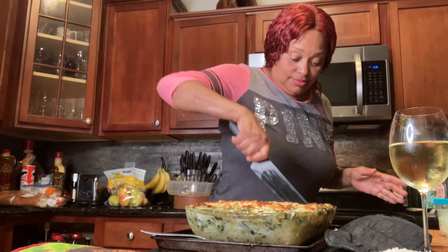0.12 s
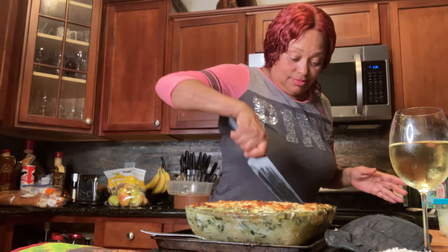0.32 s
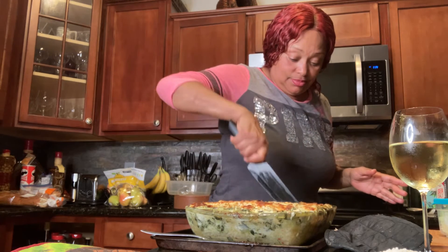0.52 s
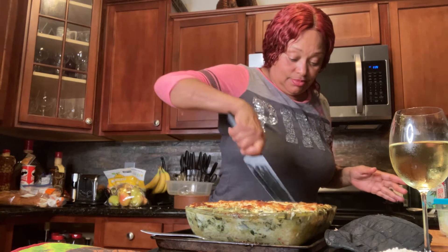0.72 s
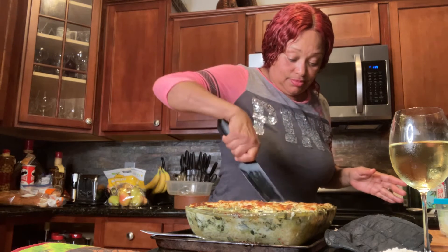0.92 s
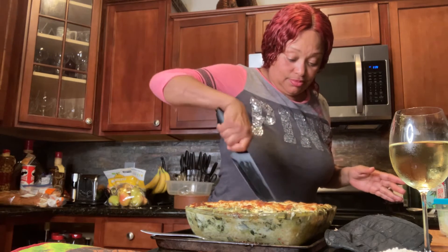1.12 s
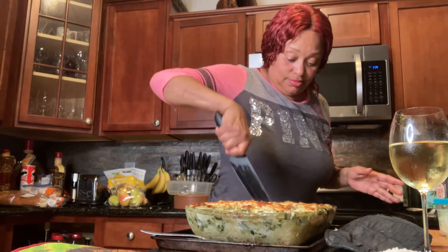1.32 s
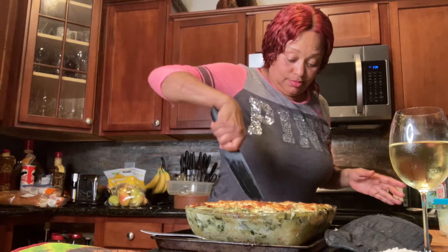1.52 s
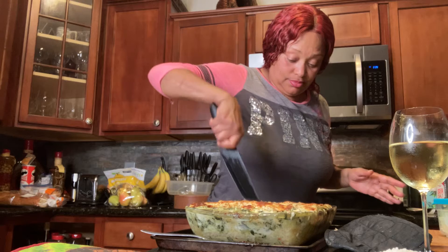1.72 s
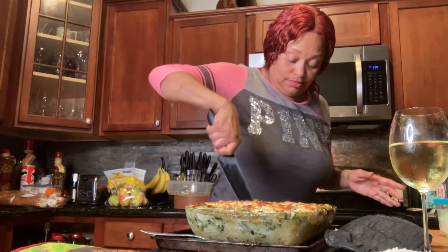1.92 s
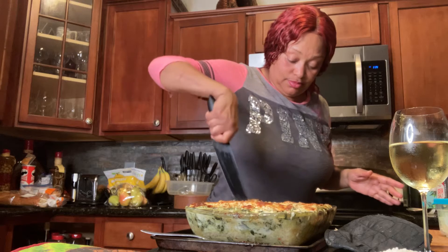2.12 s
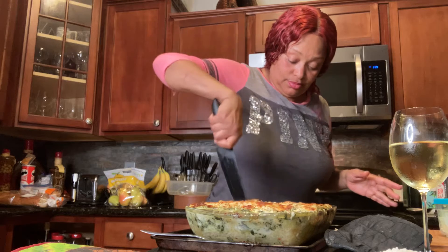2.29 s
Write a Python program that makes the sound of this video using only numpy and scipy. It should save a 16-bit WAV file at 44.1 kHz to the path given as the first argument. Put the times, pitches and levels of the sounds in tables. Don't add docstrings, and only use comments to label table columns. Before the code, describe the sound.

Six separate knife knocks on a food-loaded glass dish, unhurried and fairly even, moving from deep counter thumps to crisp clacks; slight crust crunch, short lively kitchen echo, quiet room hum, slightly dulled phone microphone nearby.

```python
import sys
import numpy as np
from scipy import signal
from scipy.io import wavfile

SR = 44100
rng = np.random.default_rng(int(sys.argv[2]) if len(sys.argv) > 2 else 0)


def digitize_waveform(pressure):
    field = np.atleast_2d(pressure).T
    bounded = np.clip(field, -1, 1)
    quanta = np.round(bounded * 32767).astype(np.int16)
    wavfile.write(sys.argv[1], SR, quanta)


def gain_from_db(level_db):
    decades = np.asarray(level_db, float) / 20
    return 10 ** decades


N = 101430

# start_s, counter_db, edge_db, crack_db
CHOPS = [
    (0.2046, 1.5, -8.5, -5.5),
    (0.6140, 0, -3, -3),
    (0.9436, -9, -3.5, -3),
    (1.3157, -13, -7, -6),
    (1.6688, -11, -3, -1.5),
    (1.9801, -8.5, -1, 0),
]
CHOP_PLACE = [0.28, 0.37, 0.68, 0.2, 0.84, 0.95]
# pitch_hz, t60_s (time to fade by 60 dB)
GLASS_NOTES = [(805, 0.013), (1100, 0.012), (1280, 0.012), (1450, 0.018), (1620, 0.013), (1920, 0.0083)]
# note1_db, note2_db, note3_db, note4_db, note5_db
GLASS_STRIKES = [(-20, -31, -25.5, -46, -31), (-31.5, -26, -34, -40, -33), (-31.5, -32, -28.5, -36, -34),
                 (-35.5, -33, -31.5, -40.5, -36), (-29.5, -34, -25.5, -46, -32),
                 (-28, -33.5, -25, -46, -29.5)]
# pitch_hz, level_db, t60_s
EDGE_NOTES = [(2360, 10, 0.003), (2730, -1, 0.014), (3510, 6.5, 0.003), (4050, -9.5, 0.013),
              (4533, -3, .012), (5160, -6, 0.0072), (5485, 1.5, 0.0044), (6200, -11, .006)]
# pitch_hz, gain (signed), t60_s
COUNTER_NOTES = [(328.2, 0.044, 0.083), (384.6, 0.62, 0.086), (403, -0.028, 0.02), (470.3, -0.62, 0.093),
                 (523.2, 0.14, 0.3), (593, 0.17, 0.043), (193, 0.021, 0.097)]
# start_s, length_s, level_db
SLIPS = [
    (0.0, 0.084, -94),
    (.3, 0.2, -79.5),
    (1.224, 0.12, -75),
]
ECHO_DELAYS = [.0030, .0060, .0095, .0128, .0150, .0190, .024]
ECHO_TREBLE = [.5, .5, .45, 1.7, 1.0, .55, .5]
ECHO_BASS = [.1, .2, .15, .4, .15, .25, .2]
# pitch_hz, t60_s, level_db
KITCHEN_TAIL = [(202, .35, -27), (450, 0.61, -5.5), (653, 0.48, -0.5), (907, 0.97, 1.5), (1600, 0.98, 1.5),
                (2550, 0.98, 12), (5570, 0.86, 12), (12000, 0.61, 17)]
# pitch_hz, level_db, t60_s
STANDING_WAVES = [(333.4, -25, 0.31), (370.8, -54, 0.12), (461.4, -29, 0.12), (494, -36.5, 0.53)]
# pitch_hz, level_db (per Hz)
MURMUR = [(40, -36.5), (95, -6), (300, 3.5), (720, -12), (2500, -24), (6500, -36), (9000, -54),
          (14500, -37.5)]

CRACK_DB, EDGE_DB, COUNTER_DB = -24, -38, -10.5
TOP_NOTE_DB = -10
EDGE_LUCK_DB = 2
GRIT_S, GRIT_DB = 0.011, -21 - 32.5
PUSH_LEAD_S, PUSH_DB = 0.008, -23.5
BOOM_LEAD_S, BOOM_LAG_S = 0.001142, 0.00187
BOOM_LOW_HZ = 168
SLIP_HZ, SLIP_WIDTH_HZ = 6460, 990
SPLIT_HZ = 2200
TAIL_DB, BASS_RISE_S, TREBLE_RISE_S = -39, 0.025, 0.0074
EARLY_DB, EARLY_T60_S = 6, 0.27
STANDING_DB = -27.5
MURMUR_DB = -56.5
HUM_HZ, HUM_WIDTH_HZ, HUM_DB = 98, 13.6, -66
MIC_LOW_HZ, MIC_CUT_HZ = 90, 6350
MIC_TOP_HZ, MIC_TOP_DB = 8550, -17.5


def rms_one(x):
    return x / np.sqrt(np.mean(x ** 2) + 1e-20)


def at_hz(points, hz, column=1):
    p = np.array(points)
    return np.interp(np.log(hz), np.log(p[:, 0]), p[:, column])


def butter(x, hz, kind, order=2):
    return signal.sosfilt(signal.butter(order, hz, kind, fs=SR, output="sos"), x)


def ring(hits, hz, t60):
    shrink = gain_from_db(-60 / (t60 * SR))
    turn = 2 * np.pi * hz / SR
    return signal.lfilter([0, np.sin(turn)], [1, -2 * shrink * np.cos(turn), shrink ** 2], hits + 1e-18)


def swell(hits, hz, t60):
    twice = ring(ring(hits, hz, t60), hz, t60)
    return twice * 2 * np.e * np.log(1000) / (t60 * SR)


def clicks(seconds, db):
    out = np.zeros(N)
    place = (np.asarray(seconds) * SR).astype(int)
    out[np.clip(place, 0, N - 1)] = gain_from_db(db)
    return out


def bands():
    edges = 30 * 2 ** np.arange(0, 9.3, 1 / 3)
    return zip(edges, edges[1:])


def knife_knocks():
    start_s, _, edge_db, crack_db = np.transpose(CHOPS)
    luck_db = EDGE_LUCK_DB * rng.standard_normal((len(start_s), len(EDGE_NOTES)))
    top_note_db = np.array(GLASS_STRIKES)[:, -1] + TOP_NOTE_DB
    strike_db = np.column_stack([GLASS_STRIKES, top_note_db])
    out = butter(clicks(start_s, CRACK_DB + crack_db), 3800, "high")
    for k, (hz, t60) in enumerate(GLASS_NOTES):
        out += (-1) ** k * swell(clicks(start_s, strike_db[:, k]), hz, t60)
    for k, (hz, db, t60) in enumerate(EDGE_NOTES):
        hits = clicks(start_s, EDGE_DB + edge_db + db + luck_db[:, k])
        out += (-1) ** k * ring(hits, hz, t60)
    return out


def crust_grit():
    start_s, _, edge_db, _ = np.transpose(CHOPS)
    hits = clicks(start_s, GRIT_DB + edge_db)
    fade = signal.lfilter([1], [1, -np.exp(-1 / (GRIT_S * SR))], hits)
    return butter(fade * rng.standard_normal(N), 2200, "high")


def counter_boom():
    start_s, counter_db = np.transpose(CHOPS)[:2]
    boom_s = start_s - BOOM_LEAD_S + BOOM_LAG_S * np.array(CHOP_PLACE)
    push = clicks(start_s - PUSH_LEAD_S, counter_db + PUSH_DB)
    drive = clicks(boom_s, counter_db) + push
    notes = sum(gain * ring(drive, hz, t60) for hz, gain, t60 in COUNTER_NOTES)
    return butter(gain_from_db(COUNTER_DB) * notes, BOOM_LOW_HZ, "high")


def blade_slips():
    t = np.arange(N) / SR
    stroke = 0
    for start_s, length_s, db in SLIPS:
        stroke = stroke + gain_from_db(db) * np.sin(np.pi * np.clip((t - start_s) / length_s, 0, 1))
    edges = [SLIP_HZ - SLIP_WIDTH_HZ / 2, SLIP_HZ + SLIP_WIDTH_HZ / 2]
    return stroke * rms_one(butter(rng.standard_normal(N), edges, "band"))


def first_echoes(x):
    low = butter(x, SPLIT_HZ, "low")
    high = x - low
    out = x.copy()
    for delay_s, bass, treble in zip(ECHO_DELAYS, ECHO_BASS, ECHO_TREBLE):
        n = int(delay_s * SR)
        out[n:] += (bass * low + treble * high)[:N - n]
    return out


def kitchen_ring(x):
    t = np.arange(SR) / SR
    white = rng.standard_normal((2, len(CHOPS), SR))
    tails = 0
    for k, (lo, hi) in enumerate(bands()):
        hz = np.sqrt(lo * hi)
        fade = gain_from_db(-60 * t / at_hz(KITCHEN_TAIL, hz)) + gain_from_db(EARLY_DB - 60 * t / EARLY_T60_S)
        rise_s = BASS_RISE_S if hz < SPLIT_HZ else TREBLE_RISE_S
        rise = np.clip(t / rise_s, 0, 1) ** 2
        level = gain_from_db(TAIL_DB + at_hz(KITCHEN_TAIL, hz, column=2))
        tails = tails + level * rise * fade * butter(white[k % 2], [lo, hi], "band")
    out = sum(gain_from_db(db + STANDING_DB) * ring(x, hz, t60) for hz, db, t60 in STANDING_WAVES)
    starts = [int((chop[0] - 2 * PUSH_LEAD_S) * SR) for chop in CHOPS[1:]]
    cuts = [0] + starts + [N]
    for tail, a, b in zip(tails, cuts, cuts[1:]):
        rung = signal.fftconvolve(x[a:b], tail)
        out[a:] += np.pad(rung, (0, N))[:N - a]
    return out


def room_tone():
    white = rng.standard_normal((3, N))
    murmur = 0
    for k, (lo, hi) in enumerate(bands()):
        level = gain_from_db(at_hz(MURMUR, np.sqrt(lo * hi)))
        murmur = murmur + level * butter(white[k % 2], [lo, hi], "band")
    hum = rms_one(ring(white[2], HUM_HZ, 4.4 / HUM_WIDTH_HZ))
    return gain_from_db(MURMUR_DB) * rms_one(murmur) + gain_from_db(HUM_DB) * hum


def scene():
    boom, knock = counter_boom(), knife_knocks()
    wet = boom + first_echoes(knock + crust_grit()) + kitchen_ring(boom + knock)
    top = gain_from_db(MIC_TOP_DB) * butter(wet, MIC_TOP_HZ, "high")
    heard = butter(wet, MIC_CUT_HZ, "low", order=5) + top
    chops = butter(heard, MIC_LOW_HZ, "high", order=4)
    background = butter(room_tone(), 35, "high", order=4)
    return (chops + background + blade_slips())[None]


def band_limit(x):
    return signal.sosfilt(signal.butter(12, 16360, fs=SR, output="sos"), x)


def record(dry):
    top_cut = signal.cheby2(12, 60, 16800, fs=SR, output="sos")
    return band_limit(signal.sosfilt(top_cut, dry))


dry = scene()
out = record(dry)
digitize_waveform(out)
```